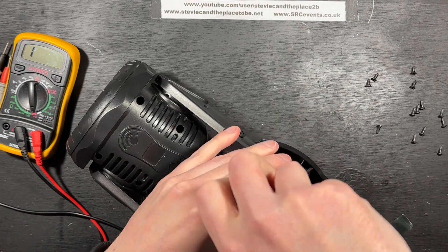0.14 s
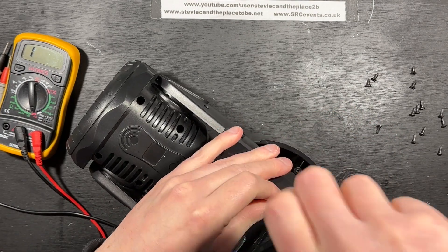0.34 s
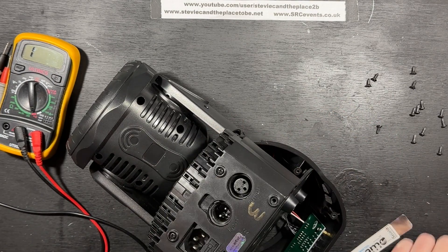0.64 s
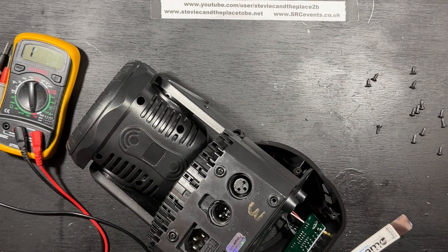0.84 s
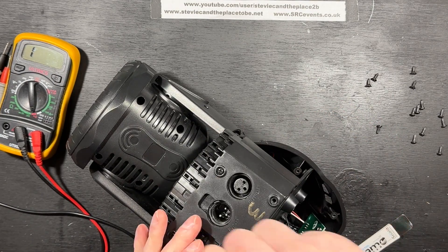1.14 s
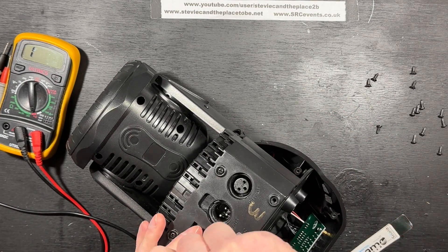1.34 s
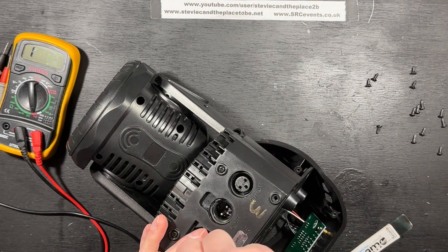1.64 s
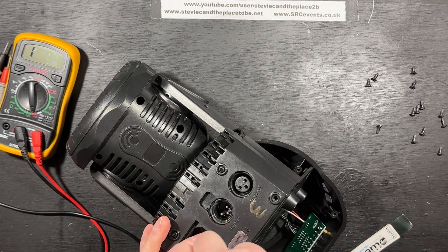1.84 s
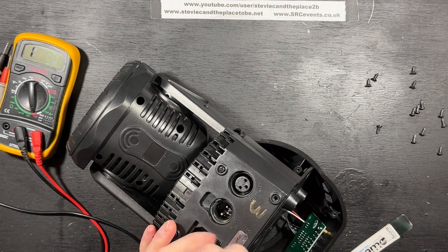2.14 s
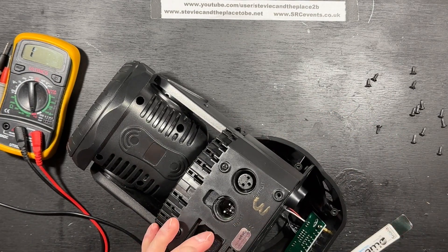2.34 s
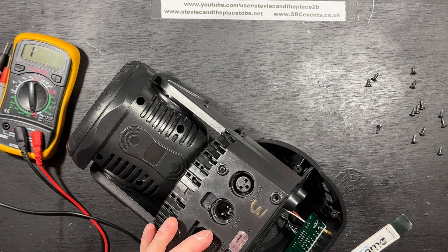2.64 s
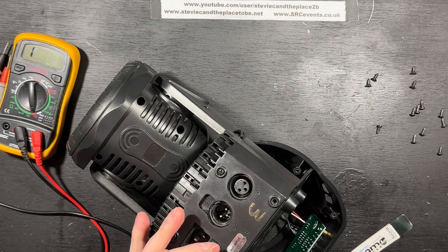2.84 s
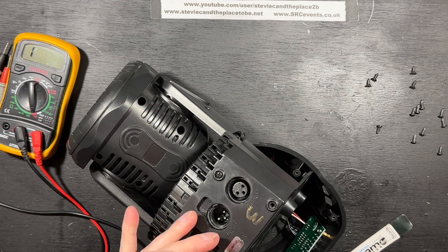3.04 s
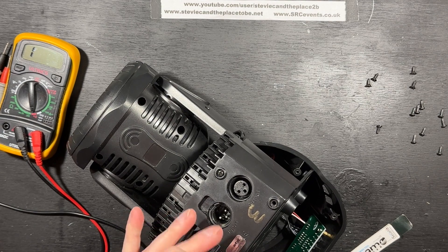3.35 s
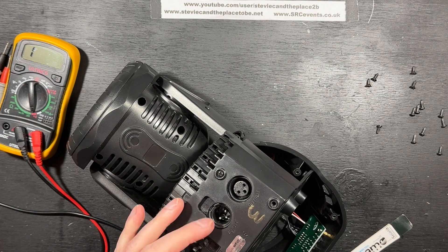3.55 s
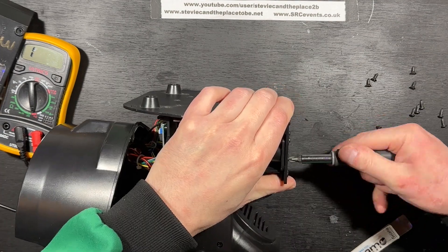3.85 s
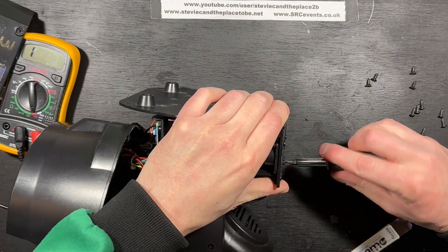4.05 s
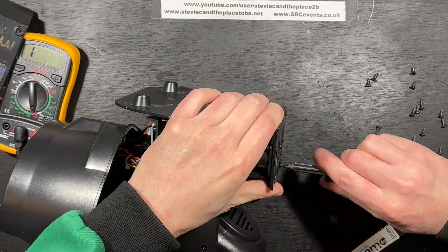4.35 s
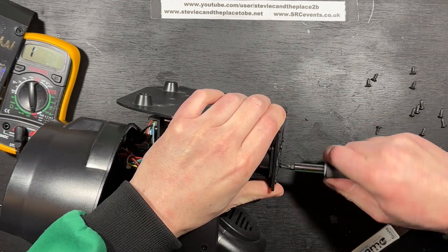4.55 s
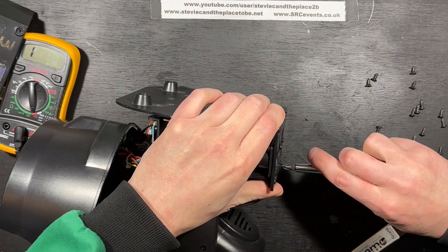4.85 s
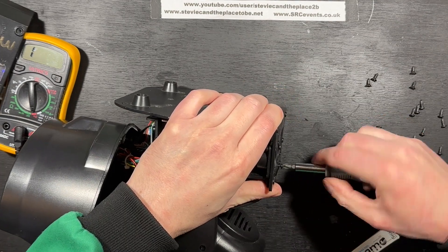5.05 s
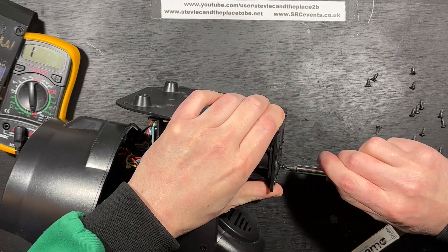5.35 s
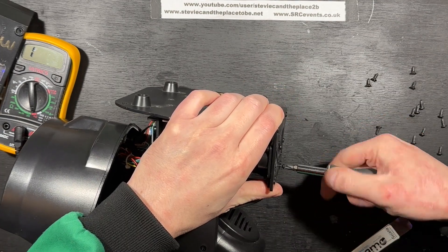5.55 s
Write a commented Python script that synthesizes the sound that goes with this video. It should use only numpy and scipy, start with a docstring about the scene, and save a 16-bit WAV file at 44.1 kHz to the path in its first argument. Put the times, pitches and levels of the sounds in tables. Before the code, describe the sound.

Irregular sharp clicks and short hollow plastic knocks as a screwdriver works on screws, with faint scraping between them.

```python
"""A hand screwdriver works on screws in a hollow plastic housing on a bench, under a close microphone.
Each contact of the steel bit knocks the shell, crunches in its ribs and ticks in the screw head; each
turn rasps through the same shell. The housing lies flat at first, then rings longer, held on its side.
Early on a loose tube slides along the bench, and the top rumbles under the hands in a quiet room."""
import sys
import numpy as np
from scipy import signal
from scipy.fft import rfft, irfft
from scipy.io import wavfile
from scipy.ndimage import uniform_filter1d

SR = 44100
rng = np.random.default_rng(int(sys.argv[2]) if len(sys.argv) > 2 else 0)


def to_wav(s):
    """Save 16-bit WAV."""
    ch = np.atleast_2d(s).T  # columns
    pcm = np.round(np.clip(ch, -1, 1) * 32767)  # PCM
    wavfile.write(sys.argv[1], SR, pcm.astype(np.int16))


N = 251811

# hits of the bit: time_s, knock_db, crunch_db, tick_db, pitch_hz, chatter_ms
BIT_HITS = [(0.0095, -34, -45.5, -65, 843, 2.4), (0.0505, -34, -56, -43.5, 655, 1.4),
            (0.0637, -28.5, -34, -51, 732, 0.87), (0.0965, -36.5, -43.5, -83, 916, 3.1),
            (0.1832, -40.5, -29, -47.5, 1123, 1.32), (0.6795, -44.5, -40.5, -47, 1033, 1.97),
            (0.7655, -33, -28, -31, 1000, 1.1), (0.7832, -39, -33, -35, 950, .8),
            (0.7942, -39, -34, -37, 950, .8), (1.3474, -43.5, -52, -69, 610, 2.74),
            (1.3566, -40, -51.5, -55, 650, 1.4), (1.3967, -39, -37, -73, 743, 1.04),
            (1.4501, -50.5, -45.5, -65, 827, 1.8), (1.7839, -42, -31.5, -73, 880, 0.99),
            (2.0351, -25.5, -22.5, -29, 1058, 0.89), (2.0719, -31, -34.5, -44.5, 897, 1.5),
            (2.2426, -35, -31, -48.5, 863, 1.74), (2.3052, -38, -35.5, -41.5, 948, 1.1),
            (2.3149, -32, -38.5, -59, 927, 1.74), (2.3478, -46, -35.5, -55.5, 1118, 5.5),
            (2.508, -40.5, -34.5, -46, 1232, 1.38), (2.5275, -37, -35.5, -51, 890, 0.62),
            (2.5868, -41.5, -36.5, -41.5, 743, 1.56), (2.6019, -26.5, -26.5, -36, 910, 0.54),
            (2.6947, -42, -40.5, -50, 940, 2.9), (2.7179, -41.5, -35.5, -48.5, 865, 2.25),
            (2.9354, -38.5, -51, -68, 1004, 0.48), (2.9845, -36.5, -40.5, -53, 860, 0.66),
            (3.0308, -37.5, -52, -76, 790, 0.65), (3.3249, -38, -45.5, -70, 810, 2.8),
            (3.3735, -23.5, -26, -24.5, 905, 0.89), (3.5678, -38.5, -40, -47.5, 1327, 0.78),
            (3.5974, -38.5, -35, -39.5, 930, 1.08), (3.685, -45, -38.5, -39, 965, 0.91),
            (3.7235, -39.5, -47.5, -82, 903, 0.44), (3.7549, -42.5, -51, -41.5, 908, 0.68),
            (3.8133, -40.5, -41.5, -80, 855, 7), (3.8636, -43, -40.5, -82, 864, 7.1),
            (3.9444, -35, -45.5, -78, 947, 1.23), (4.0354, -35, -45.5, -83, 838, 6.4),
            (4.1052, -27.5, -22.5, -21, 854, 1.05), (4.2395, -37, -37, -36, 843, 0.62),
            (4.3416, -33, -44, -70, 881, 2.54), (4.4225, -38, -43.5, -57, 900, 1.03),
            (4.4289, -53, -32.5, -33.5, 874, 0.53), (4.5346, -48, -36, -54, 925, 0.32),
            (4.65, -29.5, -35, -42.5, 892, 0.69), (4.6822, -33.5, -37, -41.5, 863, 1.22),
            (4.7875, -41, -33, -41, 923, 0.25), (4.9342, -34, -33, -40, 890, 0.34),
            (5.0288, -29.5, -30, -33.5, 890, 0.98), (5.1806, -34.5, -30, -39, 870, 1.03),
            (5.28, -37, -42, -56, 920, 1.6), (5.2907, -38.5, -37, -38.5, 950, 1.58),
            (5.3271, -26, -34.5, -50, 838, 0.34), (5.4541, -32.5, -36.5, -50, 915, 0.79),
            (5.5714, -35, -31.5, -37, 888, 0.43)]
# further hits of the bit, with a common pitch and chatter: time_s, tap_db (knock level; the crunch sits 1 dB
# above), tick_db
MORE_BIT_HITS = [(.357, -57.5, -58.5), (0.383, -67, -54.5), (0.407, -61, -49), (0.418, -57, -51),
                 (.806, -48, -48), (.945, -62, -62), (0.159, -50.5, -78), (1.4264, -48.5, -66),
                 (1.985, -64, -58.5), (3.798, -40, -62.5), (4.183, -55.5, -61), (4.892, -55, -83),
                 (2.137, -59, -84), (2.165, -54, -69), (2.234, -42, -48), (2.4704, -51.5, -43),
                 (2.5692, -43, -53), (2.781, -46.5, -71), (3.24, -48, -73), (2.9112, -56, -52),
                 (3.174, -50, -57), (3.634, -66, -41), (4.275, -45.5, -68), (4.598, -56, -71),
                 (4.6683, -43.5, -46), (4.92, -48, -58), (5.4754, -42.5, -47.5)]
BLOWS = BIT_HITS + [(s, tap_db, tap_db + 1, tick_db, 860, 1.2) for s, tap_db, tick_db in MORE_BIT_HITS]
# low modes of the hollow shell: pitch_hz, t60_s
SHELL_MODES = [(480, .014), (620, .012), (740, .014), (835, .017), (930, .014), (1050, .011), (1200, .011),
               (1400, .008), (1800, .006)]
# modes of its stiff ribs and edges: pitch_hz, fingers_on_db, fingers_off_db, t60_s
RIB_MODES = [(1550, -4, 0, .0022), (2330, 0, -5, .0035), (3250, -4, -3, .0022), (4400, -4, -7, .0018)]
# tone of dry friction: frequency_hz, level_db
RASP_SPECTRUM = [(900, -10), (1500, -3), (2300, -6), (4500, -9), (6800, -10), (14000, -12), (16000, -14)]

ON_RIBS_S, TURNED_S = 2.0, 3.7  # fingers work along the ribs, until the housing is turned on its side
# lying flat, the bench damps the shell (share of each t60) and a blow spreads over more of its modes
FLAT_RING, FLAT_SPREAD_HZ, HELD_SPREAD_HZ = .5, 240, 150


def bit_contacts():
    """Each blow is a burst of chatter that rings shell, ribs and bench, and cracks in the steel."""
    # modes of the bench under a blow: pitch_hz, t60_s
    bench_modes = [(118, 0.062), (205, 0.077), (320, 0.052)]
    bench_ring = sum(ring(hz, t60) for hz, t60 in bench_modes)
    graze, pulse_share, pulse_delay_s = 0.14, 0.32, 0.0114
    plastic, ticks = np.zeros(N), np.zeros(N)
    t = np.arange(SR // 20) / SR
    chatter = rng.standard_normal((len(BLOWS), 3, len(t)))
    scatter = rng.uniform(-1, 1, (len(BLOWS), len(RIB_MODES), 2))  # no two blows land on the same spot
    chatter *= clumps(chatter.shape, size=40, depth_db=4.)  # ragged: several slips in one contact
    for blow, (soft, dull, sharp), spots in zip(BLOWS, chatter, scatter):
        time_s, knock_db, crunch_db, tick_db, pitch_hz, chatter_ms = blow
        age = t * 1000 / np.clip(chatter_ms, .4, 12)
        slip = (age / 2) ** 2 * np.exp(2 - age)  # builds up, then dies
        burst = np.roll(slip, SR // 250) + graze * slip  # the bit brushes the spot 4 ms ahead
        start_s = time_s - chatter_ms / 500 - 1 / 250  # the burst peaks near time_s
        flat = time_s < TURNED_S
        ring_share, spread_hz, thud_db = (FLAT_RING, FLAT_SPREAD_HZ, -13) if flat else (1, HELD_SPREAD_HZ, -19)
        shell = shell_ring(pitch_hz, spread_hz, ring_share, detune=0.07 * spots[:, 0])
        # the knock pulses again about 11 ms later, as close shell modes beat
        second_pulse = ring_share * pulse_share * np.roll(burst, round(pulse_delay_s * SR))
        push = ring_share * np.sin(2 * np.pi * pitch_hz * t) + 2 * soft
        knock = signal.fftconvolve((burst + second_pulse) * push, shell)
        thud = signal.fftconvolve(burst * soft, ring(*SHELL_MODES[0]))  # pressed into the bench
        bump = signal.fftconvolve(burst, bench_ring)
        crunch = signal.fftconvolve(dull * burst, struck_ribs(spots, ON_RIBS_S < time_s < TURNED_S))
        layers = [(knock_db, knock), (knock_db + thud_db, thud), (knock_db - 26, bump), (crunch_db, crunch)]
        add(plastic, start_s, sum(gain_of(db) * x / abs(x).max() for db, x in layers))
        crack = burst * sharp
        add(ticks, start_s, gain_of(tick_db) * crack * np.linalg.norm(burst) / np.linalg.norm(crack))
    return plastic, steel(ticks)


def shell_ring(pitch_hz, spread_hz, ring_share, detune=(0, 0, 0, 0)):
    """The hollow shell rings most in the modes near the pitch of the touched part."""
    return sum((-1) ** k * ring(hz * (1 + detune[k % 4]), ring_share * t60)
               / (1 + ((hz - pitch_hz) / spread_hz) ** 2) for k, (hz, t60) in enumerate(SHELL_MODES))


def struck_ribs(spots, fingers_on):
    """The ribs ring short and bright; level, pitch and polarity vary with the spot."""
    return sum(np.sign(lift * bend) * gain_of((on_db if fingers_on else off_db) + 3 * lift)
               * ring(hz * (1 + .08 * bend), t60)
               for (hz, on_db, off_db, t60), (lift, bend) in zip(RIB_MODES, spots))


def steel(ticks):
    """Bit and screw head brighten each tick; minimum phase keeps its attack sharp."""
    # tone of the steel: frequency_hz, level_db
    spectrum = [(4000, -12), (5700, -11), (9000, -13), (13500, -7), (16000, -9)]
    hz, db = np.transpose(spectrum)
    taps = signal.firwin2(257, [0, *hz, SR / 2], gain_of([-60, *db, db[-1]]), fs=SR)
    taps = signal.minimum_phase(np.convolve(taps, taps))
    return np.convolve(ticks, taps / np.linalg.norm(taps))[:N]


def rubbing():
    """Clumps of friction clicks ring the shell; thread and skin add a rasp that also rings the ribs."""
    t = np.arange(N) / SR
    flat, held = shell_ring(960, FLAT_SPREAD_HZ, FLAT_RING), shell_ring(860, HELD_SPREAD_HZ, 1)
    ribs = sum((-1) ** k * ring(hz, t60) * gain_of(db) for k, (hz, db, _, t60) in enumerate(RIB_MODES))
    grip = clumps(N, size=400, depth_db=2.6)
    slips = grip * grit(per_s=900, spread_db=2.8)
    scrape = grip * (grit(per_s=2500, spread_db=2.2) + 0.3 * rng.standard_normal(N))
    rub = np.where(t < TURNED_S, *(unit_rms(signal.oaconvolve(slips, x)[:N]) for x in (flat, held)))
    rib_gain = gain_of(np.where((t > ON_RIBS_S) & (t < TURNED_S), 1.0, -12.5))
    rasp = coloured(scrape, RASP_SPECTRUM) + rib_gain * unit_rms(signal.oaconvolve(scrape, ribs)[:N])
    rub_gain = np.hypot(hand_strokes(column=2), bit_drag(column=1, offset_db=-21))  # trails the knock
    rasp_gain = np.hypot(hand_strokes(column=3), bit_drag(column=2, offset_db=-30))  # trails the crunch
    return rub_gain * rub + rasp_gain * rasp


def hand_strokes(column):
    """Friction envelope: each stroke takes hold, swells and is let go."""
    # turning or sliding strokes: start_s, length_s, rub_db, rasp_db
    strokes = [(0.0, 0.28, -77, -77.5), (.676, .05, -45, -57), (.8, .12, -72, -70), (2.25, 0.22, -71, -75),
               (2.675, 0.19, -72, -74.5), (2.904, 0.19, -66, -71.5), (3.141, 0.13, -63, -71.5),
               (3.574, 0.26, -73, -70), (3.783, 0.12, -45, -65), (3.95, 0.18, -56.5, -65.5),
               (4.195, 0.27, -63.5, -66.5), (4.507, 0.085, -60, -67), (4.641, 0.425, -73.5, -72.5),
               (4.762, 0.06, -60, -64.5), (5.027, 1, -70, -70), (5.631, 0.015, -45, -61.5)]
    grip_s, let_go_s, swell_db = 0.0013, 0.055, 6.5
    t, power = np.arange(N) / SR, np.zeros(N)
    for row in strokes:
        age_s, length_s = t - row[0], row[1]
        shape = np.clip(np.minimum(age_s / grip_s, 1 + (length_s - age_s) / let_go_s), 0, 1) ** 2
        power += (shape * gain_of(row[column] + swell_db * np.clip(age_s / length_s, 0, 1))) ** 2
    return np.sqrt(power)


def bit_drag(column, offset_db, fade_db_per_s=330):
    """Friction envelope: the bit drags for a moment after each blow."""
    t, power = np.arange(SR // 4) / SR, np.zeros(N)
    for row in BLOWS:
        add(power, row[0], gain_of(row[column] + offset_db - fade_db_per_s * t) ** 2)
    return np.sqrt(power)


def grit(per_s, spread_db):
    """Stick-slip friction: sparse clicks, a few of them large."""
    size = gain_of(spread_db * np.minimum(rng.exponential(1, N), 4)) * rng.choice([-1, 1], N)
    return size * (rng.random(N) < per_s / SR)


def tube_slide():
    """A loose tube is pushed along the bench, its hiss swelling as it gathers speed."""
    time_s, level_db = (.43, .55, .62, .68), (-80, -74, -63, -60)
    swell = gain_of(np.interp(np.arange(N) / SR, time_s, level_db, -200, -200))
    return swell * coloured(rng.standard_normal(N), RASP_SPECTRUM)


def bench_rumble():
    """The bench top rumbles, low and lumpy, under the hands."""
    # weight of the hands: time_s, level_db
    leaning = [(0.09, -55.5), (0.32, -68.5), (1.3, -83.5), (1.43, -66.5), (1.51, -90), (2.0, -78),
               (2.06, -59.5), (3.4, -60), (3.5, -60), (3.6, -58.5), (4.14, -58.5), (4.21, -64),
               (4.49, -57.5), (5.6, -68.5), (5.68, -48.5)]
    # tone of the bench top: frequency_hz, level_db
    spectrum = [(50, -24), (85, -8), (115, 1), (150, -7.5), (200, -5), (300, -17.5), (500, -19),
                (3000, -100)]
    weight = gain_of(np.interp(np.arange(N) / SR, *np.transpose(leaning)))
    lumps = clumps(N, size=1500, depth_db=3.) * rng.standard_normal(N)
    return weight * coloured(lumps, spectrum)


def reflections(x, t60_s=0.034, drift_rad_per_s=9.):
    """Bench and near walls: three short tails crossfade steadily, keeping the reflections even in tone."""
    t = np.arange(SR // 10) / SR
    taps = rng.choice([-1., 1.], (3, 2, len(t))) * (rng.random((3, 2, len(t))) < .1) * (t > .002)
    tails = (taps + .4 * taps[:, ::-1]) * gain_of(-60 * t / t60_s)  # partly shared between the ears
    drift = np.arange(N) / SR * drift_rad_per_s
    sends = (x * np.cos(drift + k * np.pi / 3) for k in range(3))
    return sum(signal.oaconvolve(send[None], tail / np.linalg.norm(tail[0]), axes=1)[:, :N]
               for send, tail in zip(sends, tails))


def room_tone(level_db=-80):
    """Steady faint air noise, mostly alike on both sides."""
    # tone of the air: frequency_hz, level_db
    spectrum = [(40, -40), (100, -2), (180, -2), (300, -16), (1090, -12), (1520, -7), (16000, -22)]
    shared, left, right = rng.standard_normal((3, N))
    return gain_of(level_db) * coloured(shared + .35 * np.array([left, right]), spectrum)


def gain_of(db):
    return 10 ** (np.asarray(db) / 20)


def unit_rms(x):
    return x / np.sqrt(np.mean(x ** 2) + 1e-30)


def coloured(x, spectrum):
    """Shapes x with an EQ curve of (Hz, dB) points, at rms 1."""
    hz, db = np.transpose(spectrum)
    bins_hz = np.fft.rfftfreq(x.shape[-1], 1 / SR)
    eq = gain_of(np.interp(np.log(bins_hz + 1), np.log(hz), db))
    return unit_rms(irfft(rfft(x) * eq, x.shape[-1]))


def ring(hz, t60):
    """One dying mode that takes a couple of cycles to build up."""
    t = np.arange(SR // 10) / SR
    return (1 - np.exp(-t * hz / 1.5)) * gain_of(-60 * t / t60) * np.sin(2 * np.pi * hz * t)


def clumps(shape, size, depth_db):
    """Random gain that wanders about every `size` samples."""
    wander = uniform_filter1d(uniform_filter1d(rng.standard_normal(shape), size), size)
    return gain_of(depth_db * unit_rms(wander))


def add(mix, start_s, sound):
    part = mix[max(round(start_s * SR), 0):][:len(sound)]
    part += sound[:len(part)]


def scene():
    """Housing and bench sit a touch to the right, the steel dead centre, the room around them."""
    plastic, ticks = bit_contacts()
    handling = plastic + rubbing() + tube_slide()
    direct = (handling + bench_rumble()) * gain_of([[-.6], [.4]]) + ticks
    return direct + gain_of(-5.5) * reflections(handling + ticks) + room_tone()


def record(dry, bass_cut_hz=75, edge_hz=16000):
    """The microphone's bass cut, then the band limit."""
    thin = signal.sosfilt(signal.butter(4, bass_cut_hz, "high", fs=SR, output="sos"), dry)
    band_limit = signal.firwin(1023, edge_hz, window=("kaiser", 9), fs=SR)
    return signal.oaconvolve(thin, band_limit[None], "same")


dry = scene()
out = record(dry)
to_wav(out)
```